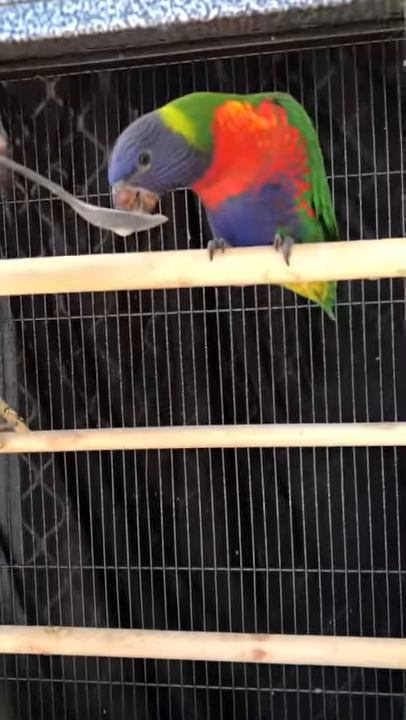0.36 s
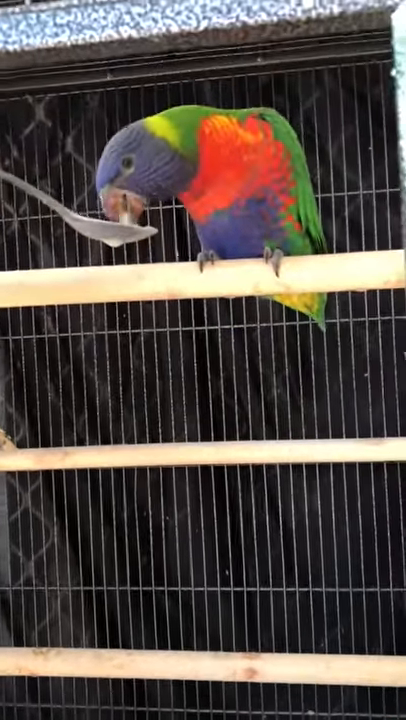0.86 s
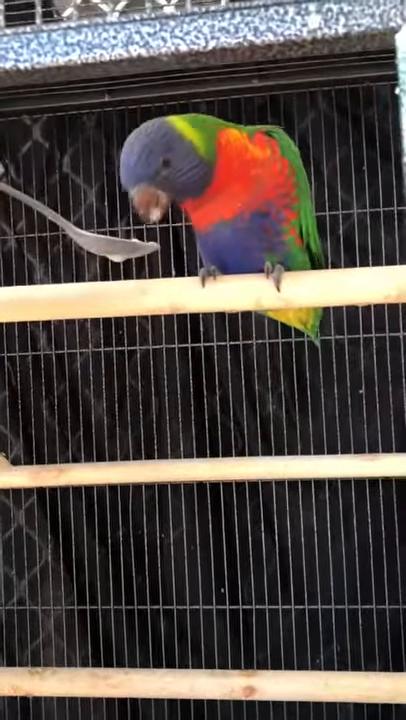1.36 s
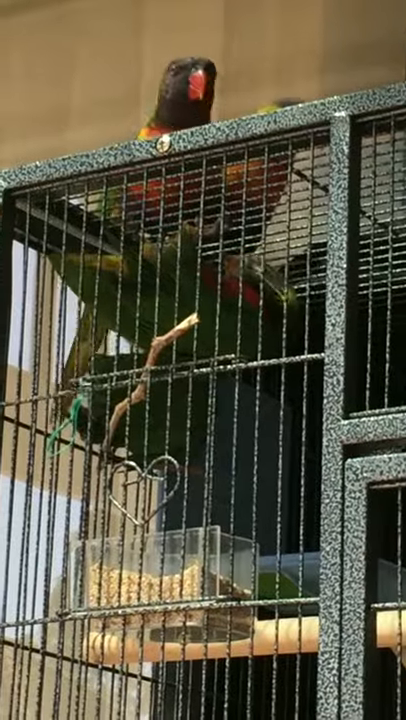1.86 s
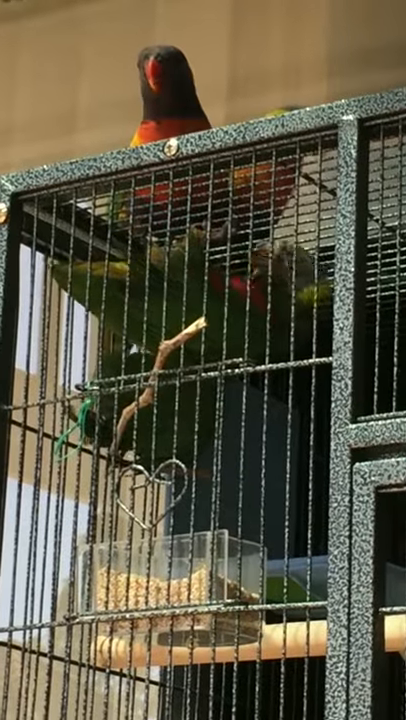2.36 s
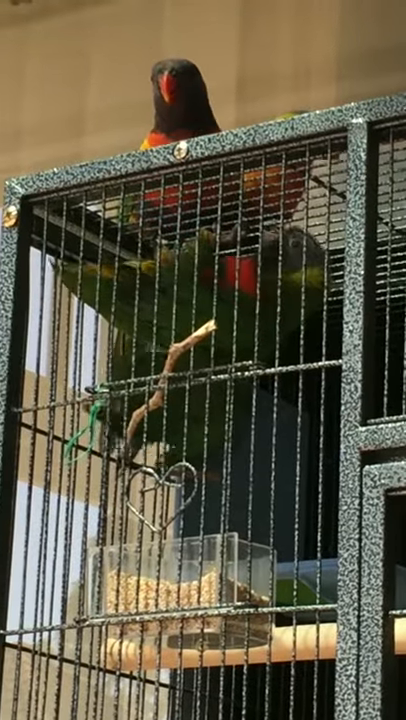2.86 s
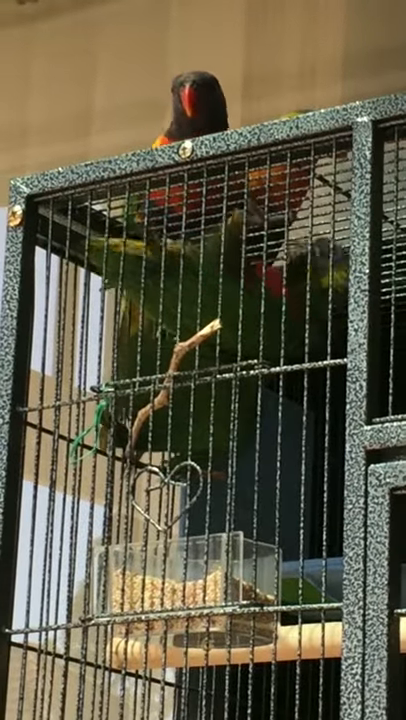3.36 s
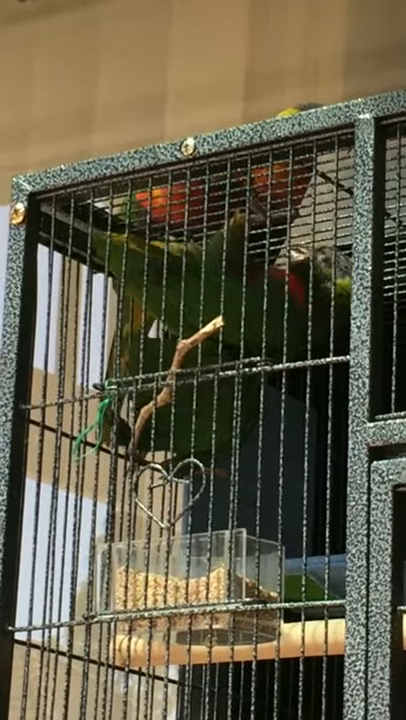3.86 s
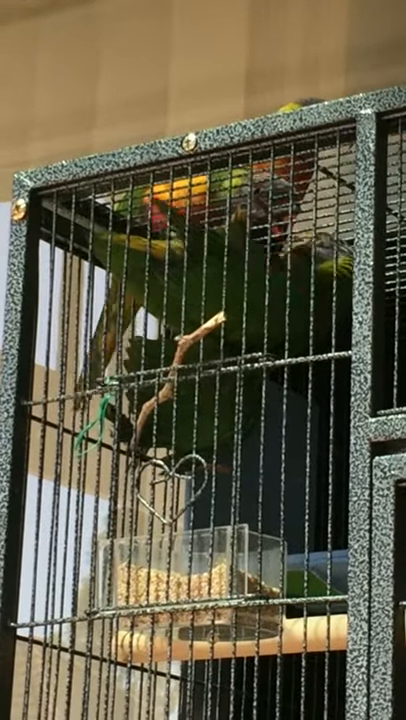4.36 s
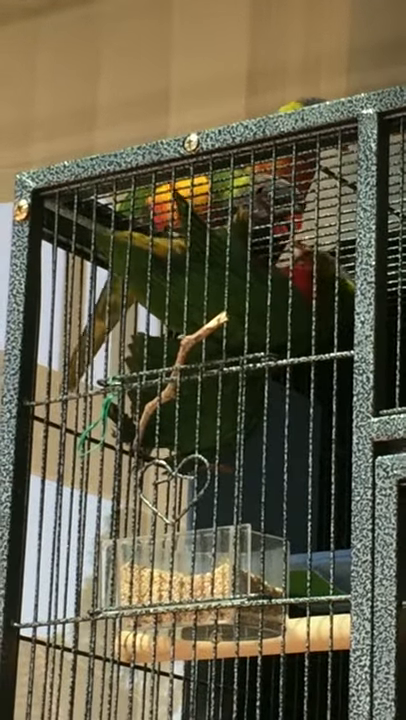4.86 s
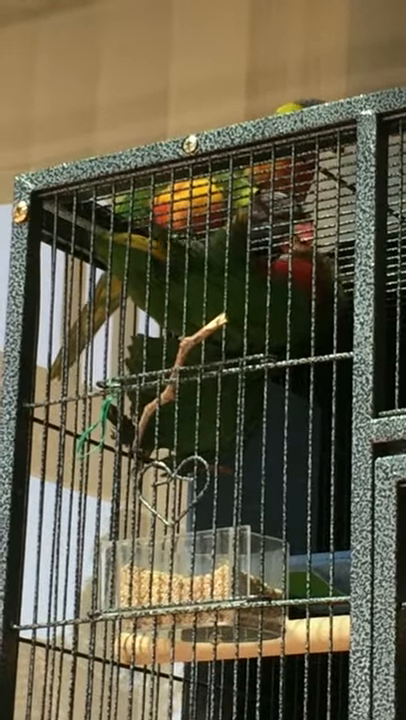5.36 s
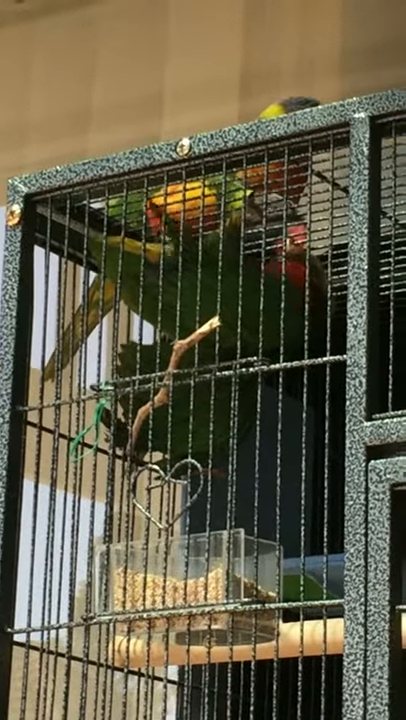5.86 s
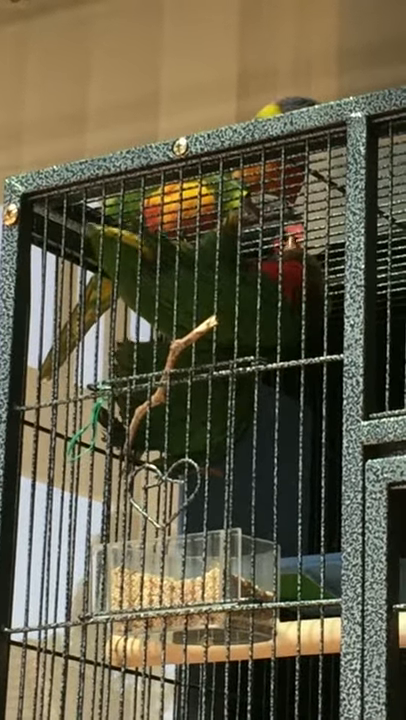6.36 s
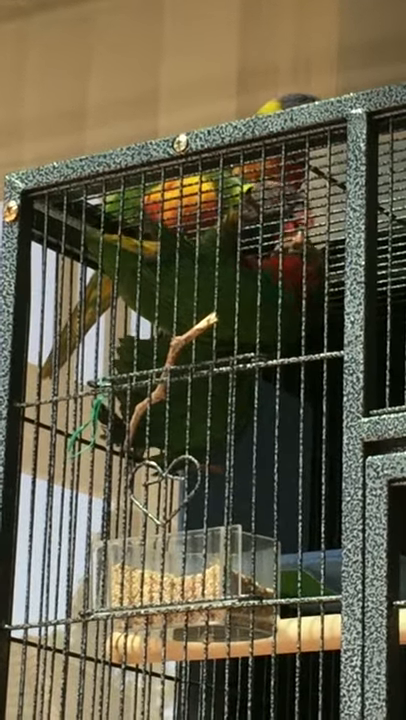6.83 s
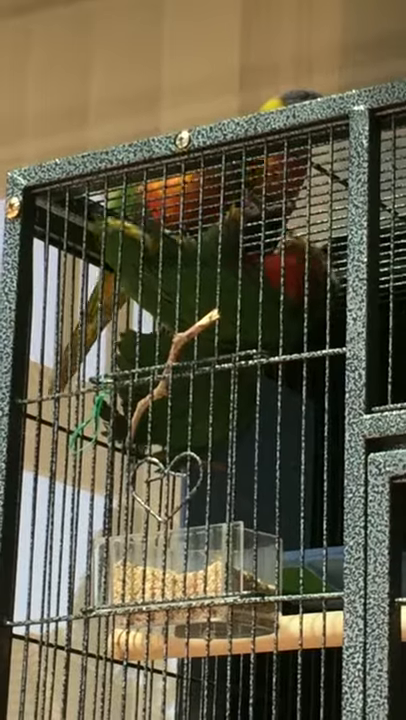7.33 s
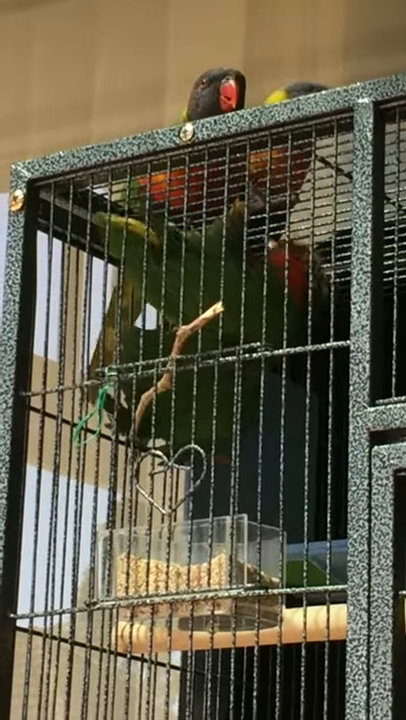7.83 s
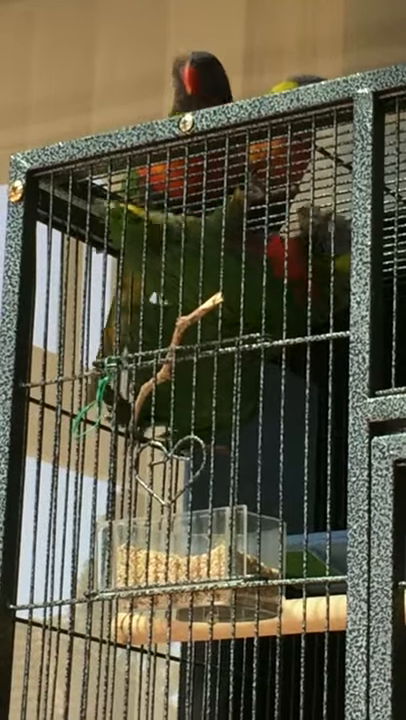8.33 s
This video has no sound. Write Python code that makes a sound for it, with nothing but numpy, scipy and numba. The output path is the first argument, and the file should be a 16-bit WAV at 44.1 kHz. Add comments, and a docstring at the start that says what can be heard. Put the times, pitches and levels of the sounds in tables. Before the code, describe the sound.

After a quiet fan and tiny spoon taps, a lorikeet repeats piercing raspy screeches in a small hard room, among chirps and faint rumble.

```python
"""Two places in turn. First a fan rushes and whines, a beak ticks on a spoon and a far bird gives arched calls.
Then lorikeets in a small hard-walled room: over shaped air noise, a machine hum and a swelling rumble,
birds chirp as gliding partials and one purrs through a throb. From two seconds on one screeches about once
a second: a croak, then a wavering whistle over rasping, resonant breath, and at the end a quick slide down.
Near the middle a trill flips between two tones."""
import sys
import numpy as np
from scipy import signal
from scipy.fft import rfft, irfft
from scipy.io import wavfile
from scipy.ndimage import uniform_filter1d
from numba import njit

SR = 44100
rng = np.random.default_rng(int(sys.argv[2]) if len(sys.argv) > 2 else 0)


def generate_wav(sig):
    """Save sig (samples, or channels by samples) to the path in sys.argv[1] as 16-bit PCM at SR."""
    pcm = np.round(np.clip(np.atleast_2d(sig).T, -1, 1) * 32767).astype(np.int16)
    wavfile.write(sys.argv[1], SR, pcm)


def amplitude_ratio(level_db):
    """Convert a level in decibels to the matching linear amplitude (field) ratio."""
    exponent = np.asarray(level_db, float) / 20
    return 10 ** exponent


N = 373086

# fan noise spectrum: (frequency [Hz], relative density [dB])
FAN_SPECTRUM = [(15, -28), (25, 7.5), (80, 4.5), (236, -5.5), (285, -9.5), (384, -15.5), (840, -17),
                (1100, -15), (1330, -21.5), (1940, -21), (2410, -23.5), (2910, -23), (16000, -45)]
# steady fan whines: (frequency [Hz], level [dB])
FAN_WHINES = [(285.3, -63.5), (1093, -67), (1190, -79.5), (1556, -80.5), (1900, -72.5), (2848, -77),
              (13571, -93), (14524, -93), (15472, -85)]
# beak ticks on a spoon: (time [s], onset level [dB])
SPOON_TICKS = [(0.0788, -63), (0.7492, -61), (0.8271, -63), (0.867, -66), (0.9393, -57), (0.9623, -65),
               (1.0042, -59), (1.1783, -58), (1.2513, -57), (1.318, -56), (1.4422, -58), (1.4716, -60)]
# far bird, one table a call: (time [s], pitch [Hz], level [dB])
FAR_CALLS = [
    [(0.56, 620, -77), (0.602, 806, -63), (0.74, 792, -73), (0.82, 658, -66)],
    [(0.99, 792, -73), (1.012, 805, -69.5), (1.192, 746, -66), (1.34, 658, -64)],
    [(1.36, 595, -73), (1.39, 590, -70), (1.5, 546, -72)],
]
# room air spectrum: (frequency [Hz], relative density [dB])
AIR_SPECTRUM = [(64, -30), (108, 1.5), (211, -6), (244, -12.5), (271, -15.5), (529, -23), (1120, -23.5),
                (1820, -27), (3130, -31), (4960, -35), (11200, -39), (16000, -47)]
# machine levels: (time [s], hum level [dB], upper hum level [dB], deep rumble level [dB])
MACHINE_LEVELS = [(1.51, -61.5, -69.5, -63.5), (2.9, -59.5, -72, -69.5), (3.5, -57.5, -65, -68),
                  (3.95, -58.5, -62, -64), (4.4, -58.5, -71, -65), (5.7, -58, -71.5, -68),
                  (5.98, -56.5, -62.5, -62), (6.27, -56.5, -73, -65.5), (7.38, -57, -78.5, -59),
                  (7.6, -58.5, -73, -52), (7.99, -57.5, -74.5, -60), (8.1, -56, -75.5, -49),
                  (8.46, -54, -70.5, -54.5)]
# deep rumble spectrum: (frequency [Hz], relative density [dB])
RUMBLE_SPECTRUM = [(15, -40), (30, -15), (45, 6), (60, 2), (100, -2), (160, -10.5), (300, -54.5)]
# short simple peeps, mostly faint: (time [s], length [s], start pitch [Hz], end pitch [Hz], level [dB])
SHORT_PEEPS = [(1.517, .045, 1730, 1646, -68.5), (1.569, 0.041, 1011, 1008, -68.5),
               (3.706, 0.11, 1943, 2002, -71), (5.186, 0.13, 1900, 1630, -66),
               (5.615, 0.052, 1420, 1484, -49.5), (5.95, .11, 1896, 1920, -67),
               (6.859, .07, 1610, 1706, -72), (8.335, 0.11, 1817, 1640, -69)]
# level contour of every peep: (share of its length [0-1], level re the peep [dB])
PEEP_CONTOUR = [(0, -9), (0.3, 0.011), (0.7, 0.0071), (1, -9)]
# near chirps, one table a note: (time [s], pitch [Hz], level [dB], second partial level [dB])
NEAR_CHIRPS = [
    [(1.84, 1990, -58, -59), (1.85, 2156, -53, -63), (1.906, 2180, -54.5, -58), (1.93, 1933, -56, -62),
     (1.964, 2050, -57, -63), (2.042, 1780, -58.5, -78), (2.05, 1822, -64, -80)],
    [(2.91, 2005, -60, -74.5), (2.924, 2394, -53, -65.5), (2.938, 2336, -51.5, -53.5),
     (2.952, 1795, -53.5, -66), (3.004, 1780, -54.5, -67.5), (3.015, 1950, -48.5, -67.5)],
    [(3.015, 2284, -51.5, -54), (3.047, 2350, -57.5, -75.5), (3.089, 2300, -56.5, -63),
     (3.14, 2297, -67.5, -87.5)],
    [(3.845, 2640, -64.5, -79), (3.855, 2450, -50.5, -50), (3.865, 2080, -42, -41),
     (3.872, 2050, -42.5, -48)],
    [(3.872, 2930, -47, -47), (3.888, 2710, -44, -60), (3.904, 2597, -43.5, -49), (3.954, 1946, -48, -56),
     (3.99, 1773, -51, -59), (4.03, 1710, -57, -60)],
    [(5.77, 2937, -68, -57), (5.784, 2950, -45, -57), (5.806, 3010, -67.5, -58.5)],
    [(5.815, 2600, -47.5, -62.5), (5.827, 2596, -38.5, -48), (5.851, 2603, -72, -74.5),
     (5.869, 2574, -51.5, -55), (5.9, 2710, -56.5, -68.5)],
    [(7.545, 1832, -67, -80), (7.567, 2143, -53, -66.5), (7.631, 2275, -58, -61), (7.667, 2160, -52.5, -72),
     (7.69, 2100, -75, -78)],
    [(7.85, 1930, -54, -69.5), (7.868, 2370, -54, -57.5), (7.898, 2625, -50, -63), (7.94, 2502, -46, -42),
     (7.964, 2597, -43, -49.5), (7.98, 2496, -44.5, -41), (7.99, 2370, -49.5, -57), (8.0, 2160, -50, -56)],
    [(8.148, 1984, -58.5, -67), (8.174, 2270, -50, -61), (8.19, 2363, -54, -64), (8.205, 2300, -46.5, -60),
     (8.235, 2297, -53, -66), (8.245, 2120, -63, -75), (8.256, 1960, -57, -76)],
]
# roughness of the near chirps: (roughness [0-1]), one a note
CHIRP_ROUGHNESS = [.55, .5, .35, .3, .45, .35, .3, .22, .2, .25]
# low purr: (time [s], pitch [Hz], level [dB])
PURR_GLIDE = [(1.78, 1536, -70), (1.804, 1703, -61.5), (1.95, 1584, -57), (2.104, 1700, -53.5),
              (2.2, 1580, -60), (2.27, 1660, -84)]
# screech levels: (time [s], rasp level [dB], lowest resonance re level [dB],
# level of the treble re level [dB])
SCREECH_LEVELS = [
    [(2.088, -45, -8, -19), (2.104, -40.5, -12, 2), (2.25, -51, -12, -18.5), (2.284, -51.5, -11.5, -53),
     (2.376, -52.5, -10.5, -10), (2.486, -57, -27.5, -14), (2.5, -58.5, -10, -23)],
    [(3.188, -64, -0.5, -11), (3.194, -38, -3.5, -15), (3.208, -39, -9.5, -5.5),
     (3.372, -44.5, -14.5, -16.5), (3.388, -47.5, -10.5, 0.5), (3.54, -58.5, -22, -7),
     (3.58, -55, -21, -31)],
    [(4.024, -48.5, 1, -18), (4.04, -29, -17, -8), (4.058, -47, -5.5, 0), (4.102, -43.5, -8.5, -8),
     (4.462, -48.5, -10.5, -9.5), (4.472, -45, -21, -9.5), (4.51, -51.5, -6, -49)],
    [(4.798, -67, -2, -27.5), (4.804, -49, -5, -24.5), (4.818, -44.5, -7.5, -5), (5.118, -42, -15, -16.5),
     (5.2, -48.5, -9, -18), (5.224, -47.5, -11.5, -5.5), (5.255, -52, -10.5, -20.5)],
    [(5.613, -55, -4, -41), (5.635, -41, -9.5, -10.5), (5.863, -46.5, -10.5, -29.5), (5.931, -46, -10, -9),
     (5.999, -48.5, -10.5, -56), (6.043, -49, -17, -15), (6.08, -55, -13, -28)],
    [(6.503, -82, 0, -6), (6.511, -50, -3, -26), (6.527, -42, -5, 1.5), (6.575, -45, -10, -9),
     (6.853, -48.5, -8.5, -6.5), (6.879, -54, -12.5, -3), (6.93, -57.5, -9.5, -29)],
    [(7.393, -67, -6.5, -16), (7.399, -37, -8.5, -19), (7.413, -41, -9, -4.5), (7.489, -48, -14, -6.5),
     (7.699, -51, -15, -6), (7.741, -58, -20, -14), (7.76, -57.5, -1, -22)],
]
# windpipe of each screech: (lowest resonance [Hz], middle [Hz], upper [Hz], upper over middle [dB],
# shift over the screech [share], throat level re rasp level [dB])
WINDPIPES = [(3800, 5350, 6250, 2, -.06, -28), (3740, 5700, 6450, 8.5, 0.03, -25),
             (3900, 5400, 6730, 4, .01, -27.5), (3623, 5050, 6620, -0.5, -.02, -28),
             (3510, 5000, 6280, -1, 0.0035, -29), (3500, 4800, 6200, -1, .03, -28),
             (3520, 5000, 6200, 3, .03, -26)]
# middle, then upper resonance re rasp level: (held level [dB], extra at the onset [dB], drift [dB/s])
RESONANCE_LEVELS = [(-5.5, 0.5, -9.5), (-5.5, -4.5, 6)]
# broad rasp in the lowest, middle and upper resonance: (width [Hz])
RASP_WIDTHS = [1500, 1800, 3200]
# croak that opens a screech: (time [s], first partial level [dB], starting pitch [Hz], decay by 60 dB [s])
OPENING_CROAKS = [(2.094, -37.5, 1032, 0.033), (3.19, -40, 976, 0.044), (4.031, -37, 1065, 0.04),
                  (4.802, -52, 1062, 0.031), (5.622, -39, 1443, 0.096), (6.507, -49, 1166, 0.061),
                  (7.399, -40.5, 1033, 0.034)]
# whistle, one table a screech: (time [s], pitch [Hz], level [dB])
WHISTLE_GLIDES = [
    [(2.104, 7567, -38), (2.112, 7677, -24), (2.125, 8000, -24), (2.128, 8540, -20.5), (2.172, 8490, -40),
     (2.184, 8040, -27), (2.21, 8500, -32.5), (2.226, 8754, -31), (2.336, 8920, -32), (2.42, 9220, -35),
     (2.438, 8850, -32.5), (2.465, 8910, -56)],
    [(3.198, 7393, -46), (3.206, 7566, -34), (3.236, 7880, -34), (3.241, 8667, -25), (3.304, 8727, -39),
     (3.356, 8950, -31), (3.448, 9804, -47.5), (3.53, 9807, -43.5), (3.57, 9680, -52)],
    [(4.04, 7766, -31), (4.05, 7886, -28), (4.072, 7874, -32), (4.076, 8783, -21), (4.095, 8695, -21.5),
     (4.123, 8647, -27), (4.234, 9103, -27.5), (4.276, 9370, -33), (4.44, 9650, -35.5),
     (4.468, 9270, -33.5), (4.49, 8315, -38.5)],
    [(4.812, 7390, -42.5), (4.82, 7886, -30.5), (4.823, 8575, -19), (4.84, 8614, -28.5), (4.874, 8640, -22),
     (4.91, 8720, -32), (5.024, 9000, -30), (5.056, 9230, -30.5), (5.142, 9510, -28), (5.158, 9704, -35),
     (5.218, 9310, -33), (5.24, 9270, -53)],
    [(5.632, 7430, -38.5), (5.646, 7650, -24.5), (5.649, 8800, -26), (5.7, 8510, -29), (5.745, 8900, -29.5),
     (5.79, 8800, -32), (5.85, 9030, -27.5), (5.905, 8830, -31.5), (5.915, 9160, -28.5),
     (5.95, 8914, -28.5), (6.004, 9070, -27.5), (6.05, 8900, -50)],
    [(6.52, 7190, -52.5), (6.53, 7280, -30), (6.536, 7605, -31.5), (6.539, 8620, -27), (6.6, 8455, -40),
     (6.68, 8590, -28.5), (6.703, 8570, -36), (6.735, 9070, -28), (6.77, 8610, -34.5), (6.84, 8750, -33.5),
     (6.874, 9300, -31), (6.9, 8715, -42.5)],
    [(7.413, 7570, -30.5), (7.42, 8300, -21), (7.443, 8240, -24), (7.447, 9040, -23), (7.458, 8950, -26),
     (7.462, 8180, -35), (7.545, 8450, -31), (7.553, 8890, -31), (7.632, 8960, -30.5), (7.66, 9330, -35.5),
     (7.713, 9020, -31.5), (7.732, 8880, -52)],
]
# random pitch hops of the whistle, one a screech: (spread [Hz])
WHISTLE_HOPS = [108.6, 50.2, 50.2, 89.84, 128.4, 150, 177]
# collapse of the voice as a screech ends: (time [s], level [dB], start [Hz], end [Hz], length [s])
VOICE_FALLS = [(2.484, -70.5, 5000, 3320, .02), (3.557, -58, 9300, 4190, 0.024),
               (4.484, -57, 8300, 2560, 0.021), (5.218, -35, 9160, 7660, 0.0194),
               (5.232, -49.5, 7000, 3500, 0.012), (6.039, -57, 8000, 2307, .028),
               (6.909, -60.5, 4800, 2180, 0.016), (7.738, -67, 7500, 2970, 0.018)]
# trill notes: (time [s], low tone level [dB], low tone pitch [Hz])
TRILL_NOTES = [(4.3665, -62.5, 1907), (4.4179, -58, 1853), (4.4543, -56, 1900), (4.5241, -51, 1798),
               (4.584, -52.5, 1895), (4.6379, -52, 1860), (4.6942, -51, 1940), (4.7556, -52.5, 1890)]

TOP_HZ = 15900  # upper edge of the sound


def curve(tables):
    """Piecewise-linear control: columns at every sample, and a gate open only inside a piece."""
    out, gate = np.ones((len(tables[0][0]) - 1, N)), np.zeros(N)
    for rows in tables:
        s, *columns = np.transpose(rows)
        i = np.arange(int(s[0] * SR), min(int(s[-1] * SR) + 1, N))
        out[:, i] = [np.interp(i / SR, s, c) for c in columns]
        gate[i] = 1
    faded = np.maximum(2 * uniform_filter1d(gate, size=176) - 1, 0)
    return (*out, gate * faded)


def soft(db, gate):
    """Amplitude envelope: gain of a level curve, steps between pieces rounded off."""
    return gate * uniform_filter1d(amplitude_ratio(db) * gate, size=88)


def walk(rate):
    """Band-limited fluctuation: random levels held 1 / rate s and slewed twice; spread near 1."""
    hold = int(SR / rate)
    steps = np.repeat(rng.standard_normal(N // hold + 1), hold)
    return 1.263 * uniform_filter1d(uniform_filter1d(steps, hold), hold)[:N]


def colour(points):
    """Spectral shaping: Gaussian noise of rms 1 weighted by a (Hz, dB) spectrum."""
    hz, db = np.transpose(points)
    f = np.maximum(np.arange(N // 2 + 1) * SR / N, 1)
    gain = amplitude_ratio(np.interp(np.log(f), np.log(hz), db))
    x = irfft(rfft(rng.standard_normal(N)) * gain, N)
    return x / x.std()


@njit
def ring(x, hz, width):
    """Resonance: state-variable band-pass with a moving centre, gain 1 there."""
    y, band, low = np.empty(len(x)), 0., 0.
    for i in range(len(x)):
        g, damping = np.tan(np.pi * hz[i] / SR), width / hz[i]
        v = (band + g * (x[i] - low)) / (1 + g * (g + damping))
        band, low, y[i] = 2 * v - band, low + 2 * g * v, damping * v
    return y


def breath(hz, width, flutter_db):
    """Resonance of turbulent flow: fluttering noise of rms 1 through two equal band-passes."""
    hz = np.maximum(hz, 500)
    noise = rng.standard_normal(N) * amplitude_ratio(flutter_db * walk(150))
    x = ring(ring(noise, hz, width), hz, width)
    return x / x.std()


def running_phase(hz):
    """Frequency modulation: phase in radians is the running sum of frequency."""
    return 2 * np.pi * np.cumsum(hz) / SR


def fan():
    """Broadband flow noise plus discrete tones: a shaped rush and whines of fixed pitch."""
    t = np.arange(N) / SR
    whines = sum(np.sqrt(2) * amplitude_ratio(db + 0.66 * walk(24.5)) * np.sin(2 * np.pi * hz * t)
                 for hz, db in FAN_WHINES)
    return amplitude_ratio(-54 + 0.34 * walk(11)) * colour(FAN_SPECTRUM) + whines


def ticks():
    """Impact: each brief contact is differentiated noise, hence bright, with exponential decay."""
    out, t = np.zeros(N), np.arange(220) / SR
    for s, db in SPOON_TICKS:
        start, grain = int(s * SR), np.diff(rng.standard_normal(221))
        out[start:start + len(t)] += amplitude_ratio(db - 60 * t / 0.0079) * grain
    return out


def far_bird():
    """Near-sinusoidal voice: a gliding fundamental with a weak second partial."""
    hz, db, gate = curve(FAR_CALLS)
    phase = running_phase(hz * (1 + 0.02 * walk(60.1)))
    voice = np.sin(phase) + amplitude_ratio(-15) * np.sin(2 * phase)
    return np.sqrt(2) * gate * amplitude_ratio(db + 2.0 * walk(38.5)) * voice


def room_air():
    """Stationary noise: the air of the room has a falling spectrum and a slowly wandering level."""
    return amplitude_ratio(-63 + walk(4)) * colour(AIR_SPECTRUM)


def machine():
    """Narrow-band hum: two frequency-modulated tones, the upper weaker, over lumpy rumble that swells."""
    hum_db, upper_db, rumble_db, _ = curve([MACHINE_LEVELS])
    hum_phase = running_phase(84 * (1 + 0.006 * walk(6)))
    upper_phase = running_phase(216.6 * (1 + 0.01 * walk(26)))
    hum = np.sqrt(2) * amplitude_ratio(hum_db + 0.8 * walk(11)) * np.sin(hum_phase)
    upper = np.sqrt(2) * amplitude_ratio(upper_db + 2.2 * walk(25)) * np.sin(upper_phase)
    rumble = amplitude_ratio(rumble_db + 2.2 * walk(9.4) + 3.0 * walk(30)) * colour(RUMBLE_SPECTRUM)
    return hum + upper + rumble


def chirps():
    """Harmonic synthesis: gliding peeps and chirps, richer as the second partial rises, roughly modulated."""
    second_db, roughness = -20.5, 0.4  # of the short peeps
    near = [[(*row, rough) for row in note] for note, rough in zip(NEAR_CHIRPS, CHIRP_ROUGHNESS)]
    peeps = []
    for s, length, from_hz, to_hz, db in SHORT_PEEPS:
        peeps.append([(s + share * length, from_hz + share * (to_hz - from_hz),
                       db + edge_db, db + edge_db + second_db, roughness) for share, edge_db in PEEP_CONTOUR])
    hz, db, second_db, rough, gate = curve(near + peeps)
    rough = np.clip(rough, 0, 1)
    phase = running_phase(hz * (1 + rough * (0.05 * walk(300) + 0.04 * walk(900))))
    # a stronger second partial also lifts the partials above it
    slope_db = uniform_filter1d(np.clip(-7.5 + 0.3 * (second_db + 43.5), -16, -4), size=220)
    upper = sum(amplitude_ratio(slope_db * (k - 2)) * np.sin(k * phase) * (k * hz < TOP_HZ) for k in range(2, 7))
    shake = amplitude_ratio(rough * (5.0 * walk(150) + 3.6 * walk(500)))
    return np.sqrt(2) * shake * (soft(db, gate) * np.sin(phase) + soft(second_db, gate) * upper)


def room(x):
    """Reverberation: dense reflections beat against gliding tones; the treble dies first."""
    t60, gap, level_db = 0.26, 0.0047, -5.5  # s, s, dB of the tail re the direct sound
    t = np.arange(int(1.2 * t60 * SR)) / SR
    noise = rng.standard_normal(len(t))
    low = signal.sosfilt(signal.butter(2, 5000, fs=SR, output="sos"), noise)
    treble = (noise - low) * amplitude_ratio(-14 * t / t60)
    tail = (low + treble) * amplitude_ratio(-60 * t / t60) * (t > gap)
    tail = tail / np.sqrt(np.sum(tail ** 2))
    return x + amplitude_ratio(level_db) * signal.fftconvolve(x, tail)[:N]


def purr():
    """Amplitude modulation: an uneven throb chops a low raspy note and bends its pitch in every throb."""
    hz, db, gate = curve([PURR_GLIDE])
    throb = running_phase(55 * (1 + 0.346 * walk(40)))
    phase = running_phase(hz * (1 - 0.057 * np.sin(throb) + 0.058 * walk(400)))
    stack = np.sin(phase) + amplitude_ratio(-22) * np.sin(2 * phase) + amplitude_ratio(-16) * np.sin(3 * phase)
    return np.sqrt(2) * gate * amplitude_ratio(db + 3.5 * walk(200)) * (1 + 0.54 * np.cos(throb)) * stack


def rasp():
    """Source and filter: noise for chaotically flapping membranes, rung by windpipe and throat resonances."""
    calls = []
    for rows, pipe in zip(SCREECH_LEVELS, WINDPIPES):
        start, end = rows[0][0], rows[-1][0]
        calls.append([(*row, row[0] - start, end - start, *pipe) for row in rows])
    rasp_db, lowest_db, treble_db, age, length, *pipe_hz, tilt_db, shift, throat_db, gate = curve(calls)
    onset = np.exp(-age / 0.02)
    throat_db = rasp_db + throat_db + 19.5 * onset
    mid_db, top_db = (rasp_db + held + extra * onset + drift * age
                      for held, extra, drift in RESONANCE_LEVELS)
    levels = rasp_db + lowest_db, mid_db - tilt_db / 2, top_db + tilt_db / 2

    # a narrow ringing core inside each broad resonance
    pipes = 0
    for hz, db, width in zip(pipe_hz, levels, RASP_WIDTHS):
        hz = hz * (1 + shift * age / length)
        core_hz = hz * (1 + 0.018 * walk(40) + 0.015 * walk(9))
        core = amplitude_ratio(-1) * breath(core_hz, 170, flutter_db=5.5)
        pipes = pipes + soft(db + 2.2 * walk(13), gate) * (core + breath(hz, width, flutter_db=1.5))
    pipes = signal.sosfilt(signal.butter(4, 3100, "high", fs=SR, output="sos"), pipes)

    throat = breath(1250 * (1 + 0.07 * walk(19)), 470, flutter_db=3.0)
    throat = throat + breath(1850 * (1 + 0.06 * walk(14)), 400, flutter_db=3.5)
    treble = signal.sosfilt(signal.butter(4, 10000, "high", fs=SR, output="sos"), rng.standard_normal(N))
    treble = amplitude_ratio(2.8 * walk(93)) * treble / treble.std()
    return pipes + soft(throat_db, gate) * throat + soft(rasp_db + treble_db, gate) * treble


def croaks():
    """Harmonic series with damping: eight low partials die away as the whistle takes hold."""
    out, t = np.zeros(N), np.arange(SR // 6) / SR
    k = np.arange(1, 9)[:, None]
    for s, db, hz, t60 in OPENING_CROAKS:
        start_phase = rng.uniform(0, 2 * np.pi, (8, 1))
        phase = 2 * np.pi * hz * (t + 0.04 * np.minimum(t, 0.03) ** 2 / 0.043)  # pitch rises slightly at first
        stack = (amplitude_ratio(-3.0 * (k - 1)) * np.sin(k * phase + start_phase)).sum(axis=0)
        attack = np.minimum(t / 0.0028, 1)
        out[int(s * SR):int(s * SR) + len(t)] += amplitude_ratio(db - 60 * t / t60) * attack * stack
    return out


def whistle():
    """Mode hopping: an unsteady tone jumps between pipe modes inside a skirt of breath."""
    hz, db, hop_hz, gate = curve([[(*row, hop) for row in rows]
                                  for rows, hop in zip(WHISTLE_GLIDES, WHISTLE_HOPS)])
    hold = int(SR / 45)  # about 45 hops a second
    hops = hop_hz * np.repeat(rng.standard_normal(N // hold + 1), hold)[:N] * (hz > 8300)
    phase = running_phase((hz + hops) * (1 + 0.005 * walk(250) + 0.005 * walk(1200)))
    # on the low opening mode every second swing is weaker: lines at a half, three halves and twice the tone
    opening = np.clip((8150 - hz) / 150, 0, 1)
    halves = amplitude_ratio(-29) * np.sin(phase / 2) + amplitude_ratio(-20) * np.sin(3 * phase / 2) + amplitude_ratio(-16) * np.sin(2 * phase)
    tone = np.sqrt(2) * amplitude_ratio(3.3 * walk(120)) * (np.sin(phase) + opening * halves)
    skirt = amplitude_ratio(-13) * breath(0.968 * hz, 1100, flutter_db=6.0)
    return soft(db, gate) * (tone + skirt)


def falls():
    """Exponential glide: the collapsing voice slides roughly down from the whistle."""
    out, wobble = np.zeros(N), 1 + 0.06 * walk(700)
    for s, db, from_hz, to_hz, length in VOICE_FALLS:
        i = int(s * SR) + np.arange(int(length * SR))
        hz = np.geomspace(from_hz, to_hz, len(i)) * wobble[i]
        shape = signal.windows.tukey(len(i), 0.4)
        out[i] += np.sqrt(2) * amplitude_ratio(db) * shape * np.sin(running_phase(hz))
    return out


def trill():
    """Frequency switching: each note flips from a low tone up to a short bright one."""
    low_s, high_s = 0.019, 0.0079
    out, wobble = np.zeros(N), 1 + 0.0097 * walk(230)
    for s, db, hz in TRILL_NOTES:
        i = int(s * SR) + np.arange(int((low_s + high_s) * SR))
        high = i / SR - s > low_s
        phase = running_phase(hz * np.where(high, 1.19, 1) * wobble[i])
        shape = signal.windows.tukey(len(i), 0.3) * np.where(high, amplitude_ratio(-3.5), 1)
        second = amplitude_ratio(np.where(high, -5, -20)) * np.sin(2 * phase)
        third = amplitude_ratio(np.where(high, -25, -17)) * np.sin(3 * phase)
        out[i] += amplitude_ratio(db) * shape * (np.sin(phase) + second + third)
    return out


def scene():
    """Superposition: two places in turn by a brief crossfade; the lorikeets share one reverberation."""
    after = np.clip((np.arange(N) / SR - 1.512) / 0.0095, 0, 1)
    first_place = fan() + ticks() + far_bird()
    bird_room = room_air() + machine()
    birds = room(chirps() + purr() + rasp() + croaks() + whistle() + falls() + trill())
    return ((1 - after) * first_place + after * bird_room + birds)[None]


def roll_off(x):
    """The treble ends steeply here."""
    return signal.sosfilt(signal.butter(12, 16490, fs=SR, output="sos"), x)


def record(dry):
    """Band limitation: the deepest bass and the top are cut off."""
    no_bass = signal.sosfilt(signal.butter(3, 36, "high", fs=SR, output="sos"), dry)
    mix = signal.sosfilt(signal.ellip(8, 0.2, 70, TOP_HZ, fs=SR, output="sos"), no_bass)
    return roll_off(mix)


dry = scene()
out = record(dry)
generate_wav(out)
```